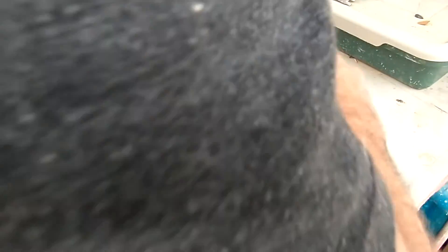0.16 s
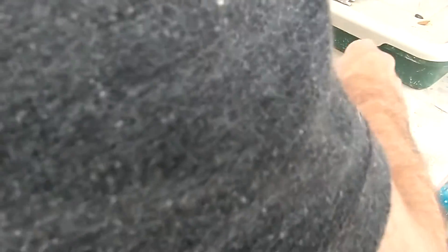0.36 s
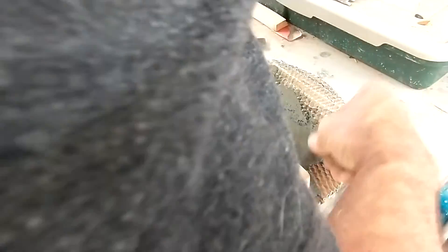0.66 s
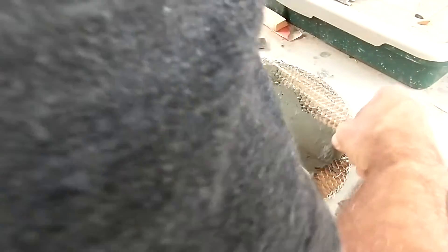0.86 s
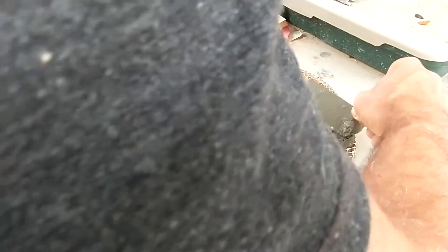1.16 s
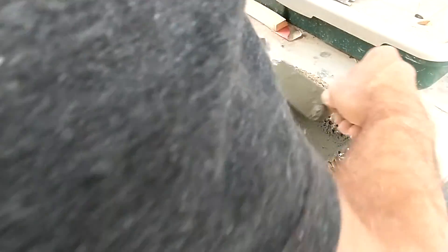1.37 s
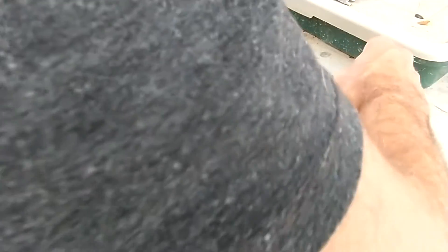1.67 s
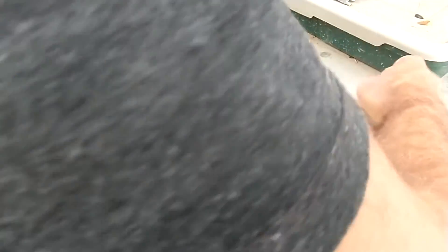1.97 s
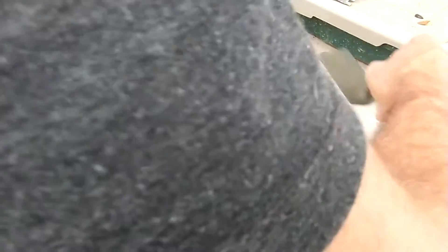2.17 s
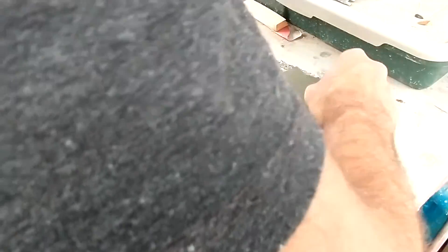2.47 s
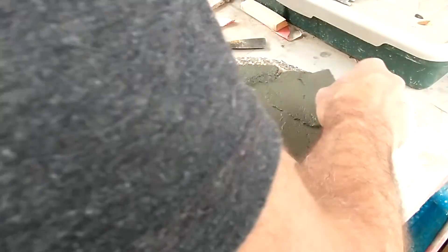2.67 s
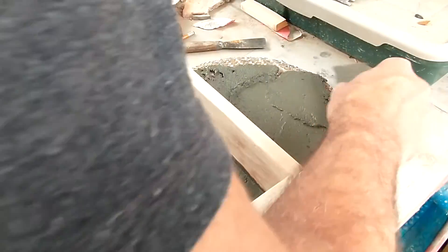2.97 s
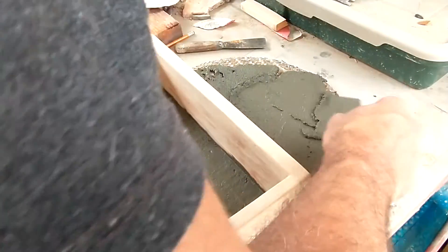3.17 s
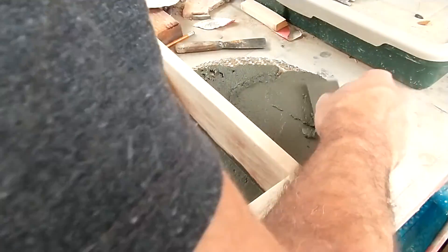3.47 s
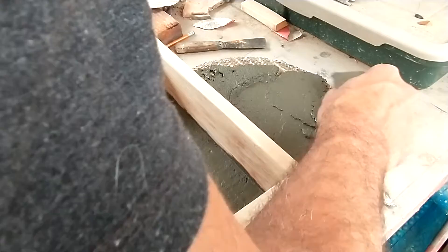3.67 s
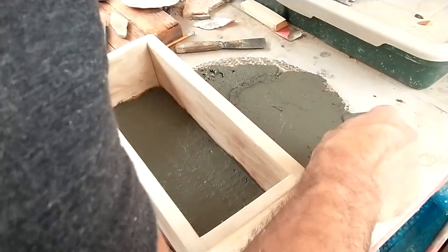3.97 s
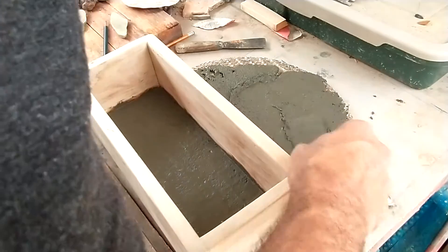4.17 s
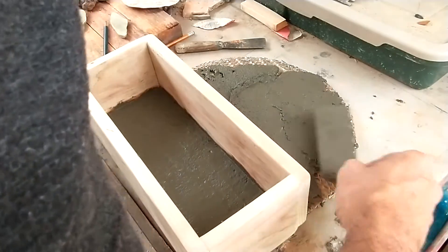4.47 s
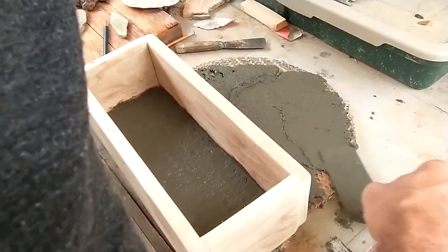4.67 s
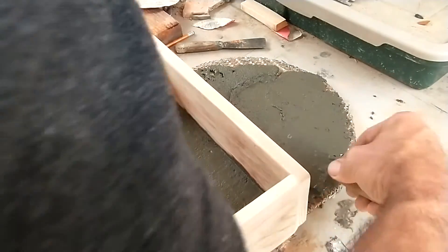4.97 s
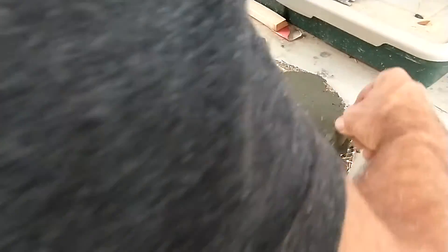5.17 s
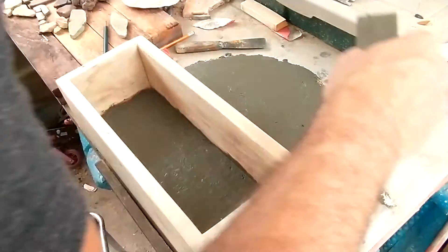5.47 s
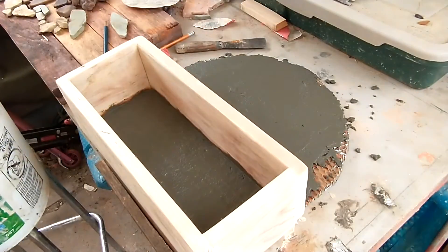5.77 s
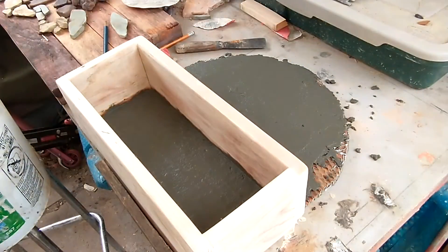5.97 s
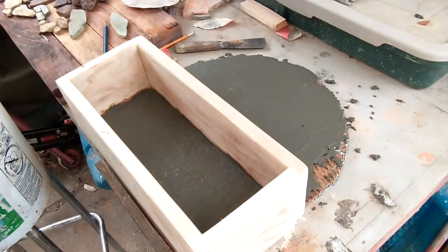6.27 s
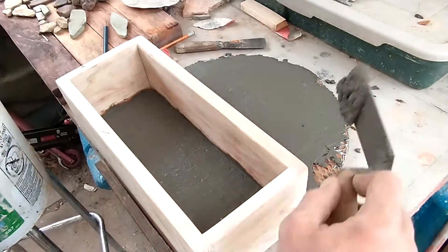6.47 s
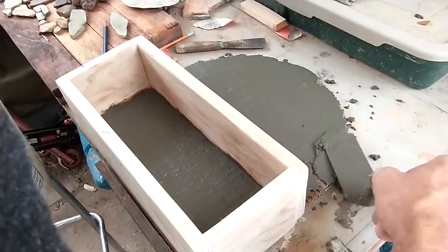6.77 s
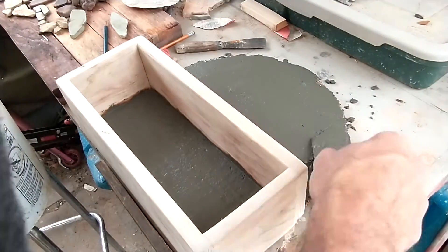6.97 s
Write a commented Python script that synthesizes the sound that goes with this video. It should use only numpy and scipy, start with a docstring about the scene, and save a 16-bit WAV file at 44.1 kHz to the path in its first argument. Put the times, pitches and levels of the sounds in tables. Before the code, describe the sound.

A steel trowel scrapes gritty mortar in short rasping strokes, close on the left, over low rumble, then after a cut makes light wet smacks.

```python
"""A steel trowel spreads mortar on a bench from the start, over a steady rumble and, at first, a low drone.
Random sand impacts excite filtered resonances of blade, bench, sand and bench top; mode-locking makes squeals.
A cut then leads to lighter work: tearing wet films make smears, and bursting air pockets make smacks.
At the cut a soft outdoor wash of filtered noise replaces the rumble; the wavering drone has died away before.
A dry garage adds reflections; the strokes lie close by on the left, the light dabs a little further off."""
import sys
import numpy as np
from scipy import signal
from scipy.fft import rfft, irfft
from scipy.io import wavfile
from scipy.ndimage import uniform_filter1d

SR = 44100
rng = np.random.default_rng(int(sys.argv[2]) if len(sys.argv) > 2 else 0)


def persist_wave(psi):
    """Save psi, clipped to +-1, as 16-bit WAV."""
    counts = np.round(np.clip(psi, -1, 1) * 32767).astype(np.int16)
    wavfile.write(sys.argv[1], SR, np.atleast_2d(counts).T)


N = 313992

# Background spectra, before and after the cut: frequency_hz, relative_density_db (dB per Hz)
RUMBLE_SPECTRUM = [(15, -41), (25, -10), (133, -3.5), (240, -10), (313, -12), (631, -18), (762, -18.5),
                   (871, -20.5), (997, -20), (1340, -26), (2170, -29.5), (2630, -30), (4620, -31.5),
                   (15500, -43.5)]
WASH_SPECTRUM = [(15, -38), (25, -25.5), (209, -10.5), (227, -8.5), (297, -4.5), (509, -8), (741, -7),
                 (848, -14.5), (919, -7), (1020, -14.5), (1800, -19.5), (2850, -27), (9050, -40),
                 (15500, -41.5)]
# Level of the wash before its trim: time_s, level_db
WASH_LEVEL = [(5.5, -63), (6.208, -63), (6.77, -59), (7.1, -61)]
# Background level, left minus right: frequency_hz, difference_db
AIR_SHADE = [(100, .5), (700, 3.6), (2000, 1), (5000, 9.3), (9000, 4.3), (15000, 1.1)]
# Drone, with its mean pitch and its level before trim: time_s, pitch_hz, level_db
DRONE = [(0.0, 102.4, -45.5), (0.216, 101.2, -60), (0.418, 94.9, -61), (0.47, 106.5, -64),
         (0.544, 107.8, -60), (0.698, 93, -72), (0.772, 107, -60), (1.052, 105.4, -67.5),
         (1.168, 116.6, -67.5), (1.412, 107.5, -64), (1.614, 91.1, -61), (1.9, 89.1, -69)]
# Pressed strokes of the blade, with drive levels before the layer trims: start_s, touch_down_s,
# time_to_full_press_s, hold_s, glide_db, press_db, rise_db_per_s, fall_db_per_s,
# bench_relative_db, sand_relative_db, rasp_relative_db, rasp_end_pitch_hz
STROKES = [(.05, 0.0047, 0.45, 0.013, -65.5, -71, 160, 148, -8.5, -9, -6, 2760),
           (.785, 0.0027, 0.3, 0.014, -70, -53.5, 46, 136, -2, 2.5, -4, 2660),
           (1.54, 0.0061, 0.15, 0.011, -65, -45, 226, 260, -1.5, -2.5, -8, 2680),
           (2.025, 0.0034, 0.091, 0.055, -62, -41, 476, 446, 1.5, 0, -8, 2330),
           (2.545, 0.0022, 0.405, 0.0095, -61.5, -49, 124, 477, -6, -8, -6.5, 2406),
           (3.232, .004, 0.049, 0.074, -59.5, -43.5, 1400, 396, -8, -4.5, -6.5, 2480),
           (3.582, .003, 0.095, 0.002, -62, -43.5, 358, 525, -6, 1.5, -7.5, 2700),
           (3.879, .001, 0.16, 0.021, -54, -55, 64, 520, -14, -7.5, -5, 2490),
           (4.238, 0.037, 0.18, 0.039, -62, -41, 101.5, 562, -15, -8, -5.5, 2735),
           (4.634, 0.0014, 0.11, 0.068, -44.5, -34.5, 1207, 625.5, -13, -5.5, -4.5, 2560),
           (5.097, 0.002, 0.089, 0.017, -54, -46, 420, 124.5, -10.5, -0.5, -6.5, 2910),
           (5.288, 0.0093, .014, .1, -55.5, -55.5, 300, 422, -5, -4.5, -6.5, 2660)]
# Landings and catches on coarse sand, with drives before trim; build-up never acts shorter than 1 ms:
# break_s, drive_db, bench_relative_db, rasp_relative_db, build_up_s
CATCHES = [(0.067, -46.5, -26, -8, 0.0032), (.392, -44, -18, -14, 0.035), (0.7902, -57, -23, -10, 0.0015),
           (0.948, -38.5, -5, -2, .001), (1.0188, -40, 6, -16, 0.00067), (1.0409, -34.5, 1, -28, 0.0015),
           (1.112, -29, 2.5, -28, 0.0011), (1.548, -61, 7, -26, 0.0008), (1.69, -29.5, -3, -27, 0.0038),
           (1.712, -33.5, 5, -24, 0.0022), (1.7804, -43, 0, -7, 0.00076), (2.0806, -36, -20, -22, .001),
           (2.1121, -33, 0, -24, 0.0035), (2.1511, -20, -1, -57, 0.017), (2.5465, -49.5, -24, -14, .001),
           (2.563, -36, -21, -27, 0.0068), (2.6713, -42, -30, -9.5, 0.0011), (2.953, -34, 8.5, -21, .01),
           (3.2789, -24.5, -1.5, -9, 0.00089), (3.33, -19.5, -7.5, -7, 0.012),
           (3.8799, -33.5, -25, 3.5, 0.00086), (3.9514, -39, -3, -35, .001),
           (4.018, -39.5, -23, -1, 0.0099), (4.062, -45.5, -18.5, 1, .004), (4.31, -37, -30, -8, 0.0015),
           (4.3476, -27.5, -26, -6.5, 0.0014), (4.3758, -27.5, -25, -19.5, 0.0041),
           (4.419, -23, -24, -13.5, 0.0044), (4.428, -19, -26.5, -14.5, .004),
           (4.6354, -23, -4, -11, 0.00088), (4.68, -29.5, 0, -5, .005), (4.712, -27, -17, -13, 0.0028),
           (4.7456, -22.5, -19.5, 0.5, .001), (4.759, -20, -5, -17, 0.0022), (4.802, -19, -20, -12.5, .002),
           (4.812, -27, -7, -8, 0.0046), (5.0998, -35.5, -30, -15.5, .001),
           (5.175, -31, 0.5, -24.5, 0.00073), (5.299, -29, -17, -19, 0.016),
           (5.3214, -30.5, -21, -23, 0.0071)]
# Resonances of steel blade, wooden bench and sand: frequency_hz, half_power_width_hz, relative_level_db
BLADE_MODES = [(1326, 16, 0.5), (1804, 160, -1), (2450, 54, -34), (2560, 216, 3), (3120, 51, 3),
               (4780, 200, -13), (4900, 130, -6), (5560, 23, -2), (6220, 270, -6.5)]
BENCH_MODES = [(370, 17, -12), (426, 51, -7.5), (535, 7.7, -9.5), (618.7, 58, 0.5), (753, 22, -9.5),
               (820, 100, -21)]
SAND_MODES = [(6670, 280, 2), (7490, 1100, 4.5), (8740, 220, -2), (9700, 350, -2)]
# Broad spectra beneath those resonances: frequency_hz, relative_density_db (dB per Hz)
BLADE_SPECTRUM = [(60, -47), (150, -38), (300, -14.5), (600, -28.5), (950, -16.5), (1180, 0), (1500, -1.5),
                  (1800, -6.5), (2700, -8), (3350, -5.5), (3800, -9.5), (5800, -9.5), (7000, -17),
                  (11000, -73)]
BENCH_SPECTRUM = [(100, -23.5), (250, -24.5), (400, -10.5), (600, -11.5), (850, -7), (1300, -15.5),
                  (3000, -89)]
SAND_SPECTRUM = [(3500, -56), (5800, -6), (7000, 7), (9800, 2), (11200, -9.5), (13500, -10), (16000, -13.5)]
# Close work, left minus right: frequency_hz, difference_db
NEAR_SHADE = [(60, 6), (200, -1), (380, 4), (700, 7), (1290, 10), (2380, 13), (4400, 18), (8120, 25),
              (15000, 11)]
# Squeals of the steel edge, with mean pitch and level before wavering: start_s, length_s, pitch_hz, level_db
SQUEALS = [(2.08, 0.027, 7840, -44), (2.104, 0.033, 9630, -36), (2.149, 0.023, 7530, -39),
           (6.906, 0.011, 9760, -41)]
# Light smears, with the drive reached at the break-off, before trim:
# start_s, length_s, level_db, fizz_relative_db
SMEARS = [(5.412, 0.017, -43.5, 3.5), (5.43, 0.021, -54, 0), (5.666, 0.038, -56.5, -7),
          (5.713, 0.018, -49, -2), (5.775, 0.041, -45, -5.5), (6.739, 0.05, -64.5, 13.5),
          (6.835, 0.075, -55, 7), (7.011, 0.068, -65, 9)]
# Bursting air pockets in the mortar, with drives before the layer trims:
# start_s, drive_db, pocket_hz, pocket_relative_db, bench_relative_db, crackle_relative_db
SMACKS = [(5.42, -29.5, 2380, -8.5, -26, -12), (5.481, -48, 2480, -23, -16, 0.5),
          (5.686, -37, 1990, -10.5, -24, -12), (5.72, -33, 2630, -9, -29, -15),
          (5.748, -49, 875, 4.5, -22, -10), (5.784, -30.5, 2520, -39, -27, -2),
          (5.815, -34.5, 2360, -39, -20.5, -4.5), (5.944, -37.5, 950, 3.5, -39, -16),
          (5.95, -37, 884, -2, -34, -5.5), (5.982, -50, 1010, -20, -29, -3),
          (6.155, -32, 960, -23, -12, -36), (6.201, -34.5, 970, -4, -20, -5),
          (6.554, -20, 1700, -10.5, -18, -19.5), (6.741, -50, 759, -14, 3, -5),
          (6.757, -45, 2500, -20, -16, -6), (6.763, -33.5, 2460, -20, -16, -5),
          (6.781, -33, 2480, -18, -20, -10), (6.833, -38, 1560, -8, -27, -1),
          (6.859, -33.5, 770, -14, -27, -5.5), (6.911, -33, 740, -12, -38, -6)]
# Resonances of the wet paste: frequency_hz, half_power_width_hz, relative_level_db
PASTE_MODES = [(2370, 290, 4), (3040, 110, 4), (4550, 300, -0.5), (5050, 100, -13.5), (6560, 330, 1.5)]
# Broad spectra of the paste and of its fine fizz: frequency_hz, relative_density_db (dB per Hz)
PASTE_SPECTRUM = [(100, -17), (700, -7.5), (1400, -2.5), (2300, -11), (5500, 4), (8000, -5.5), (11000, -35),
                  (16000, -47)]
FIZZ_SPECTRUM = [(1000, -58), (5000, -24), (8500, -2.5), (10000, 5.5), (12000, 1.5), (16000, -1.5)]
# Further work, left minus right: frequency_hz, difference_db
FAR_SHADE = [(200, 7.6), (1000, 0.5), (2500, 5.6), (6000, 7.6), (10000, 14), (15000, 15)]

TAPS = 4096  # filter length in samples
TIME = np.arange(N) / SR
FREQS = np.maximum(np.arange(TAPS // 2 + 1) * SR / TAPS, 1)
TOP_HZ = 15850
CUT_S = 5.445  # middle of the cut from rumble to wash; later squeals belong to the lighter work
RASP_SAG = .09  # share by which the rasp starts high, sliding down through the stroke
BITE_DB, BITE_S = 3.5, 0.0084  # the edge digs in for a moment as it lands
BENCH_GROWTH, SAND_GROWTH, BOOM_GROWTH, RASP_GROWTH = 1.23, 1.52, 0.54, 0.84  # dB gained per dB of the blade
BOOM_DB = -17.5  # drive of the whole bench top, relative to the blade before its trim
BUILD_UP_SIZE = 2048  # samples of crunch before each break
CATCH_DECAY_S, SMACK_DECAY_S = 0.0052, 0.0056
SMEAR_ATTACK_S, SMEAR_SWELL_DB, SMEAR_FALL_DB_PER_S = .003, 9.5, 1100


def undb(db):
    """Logarithmic level: convert decibels to an amplitude gain."""
    return 10 ** (np.asarray(db) / 20)


def gains(points):
    """Interpolated spectrum: draw gains from (Hz, dB) points along a logarithmic frequency axis."""
    hz, db = np.transpose(points)
    return undb(np.interp(np.log(FREQS), np.log(hz), db))


def causal(gain):
    """Minimum phase: fold the cepstrum of a gain curve to obtain a causal impulse response."""
    cepstrum = irfft(np.log(gain + 1e-7))
    cepstrum[1:TAPS // 2] *= 2
    cepstrum[TAPS // 2 + 1:] = 0
    return irfft(np.exp(rfft(cepstrum)))


def through(x, response):
    """Linear filtering: convolve a sound with an impulse response."""
    return signal.oaconvolve(np.float32(x), np.float32(response))[:len(x)]


def shape(x, gain):
    """Zero-phase filtering: weight the frequencies of a sound without delaying it."""
    response = np.roll(irfft(gain), TAPS // 2)
    filtered = signal.oaconvolve(np.float32(x), np.float32(response))
    return filtered[TAPS // 2:TAPS // 2 + N]


def body(points, modes=()):
    """Modal superposition: add resonance powers to a broad spectrum, giving a unit-energy response."""
    power = gains(points) ** 2
    for hz, width, db in modes:
        detuning = (FREQS / hz - hz / FREQS) * hz / width
        power = power + undb(db) ** 2 / (1 + detuning ** 2)
    response = causal(np.sqrt(power))
    return response / np.linalg.norm(response)


def walk(rate):
    """Band-limited fluctuation: smooth random steps, rate per second, to unit standard deviation."""
    hold = max(int(SR / rate), 9)
    steps = rng.standard_normal(N // 8)[np.arange(N) // hold]
    smooth = uniform_filter1d(steps, hold)
    return smooth / smooth.std()


def follow(table, column):
    """Linear interpolation: read one column of a time curve at every sample."""
    rows = np.array(table)
    return np.interp(TIME, rows[:, 0], rows[:, column])


def grit(rate, spread_db):
    """Random impacts: sand grains crack independently, many small and a few large, to unit deviation."""
    size = undb(spread_db * np.minimum(rng.exponential(size=N), 5))
    grains = (rng.random(N) < rate / SR) * size * rng.choice([-1, 1], N)
    return grains / grains.std()


def burst(decay_s, tick):
    """Impulsive excitation: one sharp contact heads an exponentially dying shower of noise."""
    push = rng.standard_normal(TAPS) * np.exp(-TIME[:TAPS] / max(decay_s, .001))
    push[0] += tick
    return push


def add(track, s, sound):
    """Superposition: add a sound to a track at a time in seconds."""
    start = int(s * SR)
    track[start:start + len(sound)] += sound[:N - start]


def air(points, apart_hz, low_apart_hz=22):
    """Spatial coherence: noise is alike at both sides in the bass, unrelated in treble and deepest rumble."""
    likeness = .9 / (1 + (FREQS / apart_hz) ** 2) / (1 + (low_apart_hz / FREQS) ** 2)
    ratio = np.sqrt(gains(AIR_SHADE))
    mid, side = (through(rng.standard_normal(N), body(points)) for _ in range(2))
    side = shape(side, np.sqrt((1 - likeness) / (1 + likeness)))
    stereo = np.array([shape(mid + side, ratio), shape(mid - side, 1 / ratio)])
    return stereo * undb(walk(6.7))  # the level wanders by about 1 dB


def background(rumble_db=-65.5, wash_trim_db=-2):
    """Filtered noise: at the cut, an 11 ms crossfade replaces a steady rumble by a brighter wash."""
    late = np.clip((TIME - CUT_S) / 0.011 + .5, 0, 1)
    rumble = air(RUMBLE_SPECTRUM, apart_hz=1100) * undb(rumble_db)
    wash = air(WASH_SPECTRUM, apart_hz=1750) * undb(follow(WASH_LEVEL, 1) + wash_trim_db)
    return (1 - late) * rumble + late * wash


def drone(trim_db=0.5, upper_db=-7, upper_ratio=1.72, rumble_db=-6, rumble_side_db=-5):
    """Frequency modulation: an unsteady low tone, a weaker upper tone and wide rumble die away early."""
    pitch = follow(DRONE, 1) * (1 + 0.02034 * walk(33.2))
    phase = 2 * np.pi * np.cumsum(pitch) / SR
    upper = undb(upper_db + 3 * walk(35)) * np.exp(-TIME / 1.5)
    tone = np.sin(phase) * undb(2 * walk(24.1)) + upper * np.sin(upper_ratio * phase)
    colour = body([(15, -16), (45, 4), (100, 6), (180, -0.5), (300, -16.5), (1000, -48)])
    mid, side = (through(rng.standard_normal(N), colour) for _ in range(2))
    sides = np.array([[1], [-1]])
    rumble = undb(rumble_db) * (mid + sides * undb(rumble_side_db) * side)
    fade = np.interp(TIME, [1.7, 2.0], [1, 0])
    return (tone + rumble) * undb(follow(DRONE, 2) + trim_db) * fade


def stroking():
    """Contact pressure: glide, press, hold and release set five layer gains and the rasp pitch."""
    blade, edge, bench, sand, boom = np.zeros((5, N))
    pitch, t = np.full(N, float(STROKES[0][-1])), TIME[:SR]
    for (s, touch_s, reach_s, hold_s, glide_db, press_db, rise, fall,
         bench_db, sand_db, rasp_db, hz) in STROKES:
        glide = undb(glide_db - press_db + BITE_DB * np.exp(-t / BITE_S))
        pressure = np.hypot(glide, undb(-rise * np.maximum(reach_s - t, 0)))
        release_db = -fall * np.maximum(t - reach_s - hold_s, 0)
        contact = undb(press_db + release_db) * np.minimum(t / touch_s, 1)
        add(blade, s, contact * pressure)
        add(edge, s, contact * undb(rasp_db) * pressure ** RASP_GROWTH)
        add(bench, s, contact * undb(bench_db) * pressure ** BENCH_GROWTH)
        add(sand, s, contact * undb(sand_db) * pressure ** SAND_GROWTH)
        add(boom, s, contact * undb(BOOM_DB) * pressure ** BOOM_GROWTH)
        start = int(s * SR)
        pitch[start:] = hz * np.interp(TIME[:N - start], [0, reach_s + hold_s], [1 + RASP_SAG, 1])
    return blade, edge, bench, sand, boom, pitch


def catching(trim_db=-11, thud_db=-3, tick=2.5):
    """Fracture: coarse sand crunches up under the edge and breaks, pushing steel, bench and rasp."""
    hits, thuds, scratches = np.zeros((3, N))
    for s, db, bench_db, rasp_db, build_s in CATCHES:
        crunch = burst(build_s, tick=0)[:BUILD_UP_SIZE][::-1] * .5  # reversed decay: a build-up
        push = undb(db + trim_db) * np.concatenate([crunch, burst(CATCH_DECAY_S, tick)])
        start_s = s - BUILD_UP_SIZE / SR
        add(hits, start_s, push)
        add(thuds, start_s, push * undb(bench_db + thud_db))
        add(scratches, start_s, push * undb(rasp_db))
    return hits, thuds, scratches


def grinding(slip, coarse_share):
    """Granular friction: fine sand and coarser grains pulse with the slip of the blade."""
    fine, coarse = grit(rate=14000, spread_db=2), grit(rate=550, spread_db=2.1)
    return slip * (fine + coarse_share * coarse) / np.hypot(1, coarse_share)


def rasp(push, pitch_hz, width):
    """Variable-length resonance: the free length of the blade shifts in pitch as the contact moves."""
    pitch = np.log(pitch_hz)
    centres, step = np.linspace(pitch.min(), pitch.max(), 9, retstep=True)
    skirt = [(300, -59.0), (1500, -13.0), (4500, -8.0), (12000, -48.0)]
    total = np.zeros(N)
    # fixed resonators crossfade at equal power to follow the sliding pitch
    for centre, hz in zip(centres, np.exp(centres)):
        share = np.sqrt(np.maximum(1 - np.abs(pitch - centre) / step, 0))
        total += through(push * share, body(skirt, [(hz, hz * width, 0)]))
    return total


def scraping(slip_db=1.64, catch_hiss_db=-5, stone_share=0.26):
    """Friction-driven vibration: sliding grit drives steel, bench and hiss; larger stones tick on the edge."""
    slip = undb(slip_db * (walk(150) + 0.44))
    stones = stone_share * grit(rate=110, spread_db=1.0)
    grains = grinding(slip, coarse_share=0.71)
    hits, thuds, scratches = catching()
    drive, edge_drive, bench_drive, sand_drive, boom_drive, rasp_hz = stroking()
    blade_push = grains * drive * undb(-5.5) + hits
    edge_push = (grinding(slip, coarse_share=1.0) + stones) * edge_drive + scratches
    bench_push = grains * bench_drive * undb(-2) + thuds
    sand_push = (grinding(slip, coarse_share=1.0) + stones) * sand_drive * undb(-0.5)
    sand_push += hits * undb(catch_hiss_db)
    bench_top = body([(30, -20), (85, 1.5), (120, 0), (170, 2.5), (320, -3.0), (700, -60)])
    blade = through(blade_push, body(BLADE_SPECTRUM, BLADE_MODES))
    edge = rasp(edge_push, rasp_hz, width=0.34)
    bench = through(bench_push, body(BENCH_SPECTRUM, BENCH_MODES))
    sand = through(sand_push, body(SAND_SPECTRUM, SAND_MODES))
    boom = through(grains * boom_drive, bench_top)
    return blade + edge + bench + sand + boom


def tail(t60_s):
    """Diffuse reverberation: unit-energy scattered reflections fall by 60 dB in t60 seconds."""
    t = TIME[:SR // 2]
    echoes = rng.standard_normal(len(t)) * undb(-60 * t / t60_s) * (t > .0007)
    return echoes / np.linalg.norm(echoes)


def garage(x, shade, bench_db, bench_t60_s, room_db, room_t60_s, shadow_hz):
    """Direct and reflected sound: bench and dry room reflect; the right side gets little direct treble."""
    ratio, out = gains(shade), []
    left = (np.ones(len(FREQS)), ratio)
    right = (1 / np.hypot(1, FREQS / shadow_hz), 1)
    for direct, port in (left, right):
        # hand and blade keep moving, so the pattern of near reflections keeps changing
        places = np.array([walk(9) for _ in range(4)])
        places /= np.linalg.norm(places, axis=0)
        near = sum(through(x * share, tail(bench_t60_s)) for share in places)
        room = through(x, tail(room_t60_s))
        sound = shape(x, direct) + undb(bench_db) * near + undb(room_db) * room
        total = np.sqrt(direct ** 2 + undb(bench_db) ** 2 + undb(room_db) ** 2)
        out.append(shape(sound, 2 * port / (1 + ratio) / total))
    return np.array(out)


def squealing(wobble=0.038):
    """Mode locking: for a moment the slipping locks on to a high mode of the steel."""
    out, waver, strength = np.zeros(N), walk(1300), undb(2.0 * walk(500))
    for s, length_s, hz, db in SQUEALS:
        swell = np.sin(np.pi * np.clip((TIME - s) / length_s, 0, 1))
        phase = 2 * np.pi * np.cumsum(hz * (1 + wobble * waver)) / SR
        out += undb(db) * swell * np.sin(phase)
    return out * strength


def smearing(trim_db=-3, fizz_trim_db=-2.5):
    """Film rupture: tiny wet films tear under the gliding blade, swelling in level until it lifts."""
    drive, fine = np.zeros((2, N))
    t = TIME[:SR // 2]
    for s, length_s, db, fine_db in SMEARS:
        swell_db = SMEAR_SWELL_DB * np.minimum(t / length_s - 1, 0)
        fall_db = -SMEAR_FALL_DB_PER_S * np.maximum(t - length_s, 0)
        glide = undb(db + swell_db + fall_db) * np.minimum(t / SMEAR_ATTACK_S, 1)
        add(drive, s, glide)
        add(fine, s, glide * undb(fine_db))
    films = grit(rate=3000, spread_db=3) * undb(2.5 * walk(140))
    paste = through(films * drive, body(PASTE_SPECTRUM, PASTE_MODES))
    fizz = through(films * fine, body(FIZZ_SPECTRUM))
    return undb(trim_db) * paste + undb(fizz_trim_db) * fizz


def smacking(trim_db=-12, fizz_db=-7, pocket_db=5, thud_db=8, pocket_width=0.14):
    """Cavity resonance: mortar slaps or lets go with a wet crackle, a ringing air pocket and a soft thud."""
    crackle, pockets, thuds = np.zeros((3, N))
    for s, db, hz, ring_db, bench_db, crackle_db in SMACKS:
        push = undb(db + trim_db) * burst(SMACK_DECAY_S, tick=8.9)
        skirt = [(300, -30), (800, -9), (hz + 300, -11), (hz * 2, -22), (8000, -45)]
        pocket = body(skirt, [(hz, hz * pocket_width, 0)])
        add(crackle, s, undb(crackle_db) * push)
        add(pockets, s, undb(ring_db + pocket_db) * through(push, pocket))
        add(thuds, s, undb(bench_db + thud_db) * push)
    wet = body(PASTE_SPECTRUM, PASTE_MODES) + undb(fizz_db) * body(FIZZ_SPECTRUM)
    soft = body([(100, -33), (280, -11), (460, -1.5), (750, -2.5), (1500, -23)])
    return through(crackle, wet) + pockets + through(thuds, soft)


def scene():
    """Superposition of sources: firm strokes close by and light dabs further off, over drone and noise."""
    squeals, late = squealing(), TIME > CUT_S
    near = garage(scraping() + squeals * ~late, NEAR_SHADE, bench_db=-3.5, bench_t60_s=0.052,
                  room_db=-28.0, room_t60_s=0.44, shadow_hz=790)
    far = garage(smearing() + smacking() + squeals * late, FAR_SHADE, bench_db=-1.5, bench_t60_s=0.011,
                 room_db=-18.5, room_t60_s=0.44, shadow_hz=1950)
    return near + far + drone() + background()


def record(dry):
    """Band limiting: an elliptic low-pass filter cuts the highest treble steeply."""
    return signal.sosfilt(signal.ellip(10, .2, 70, TOP_HZ, fs=SR, output="sos"), dry)


dry = scene()
out = record(dry)
persist_wave(out)
```